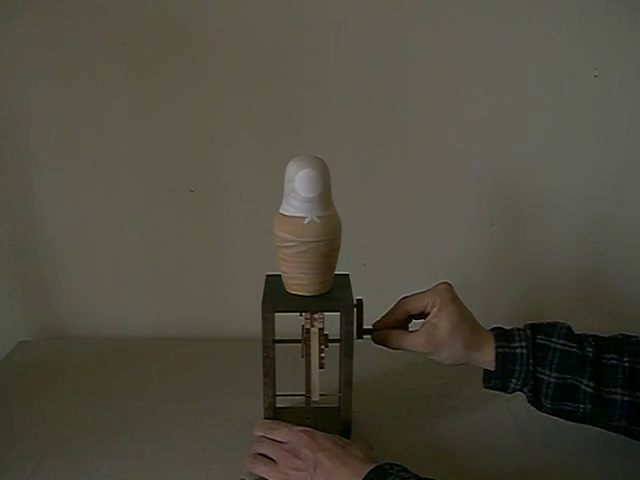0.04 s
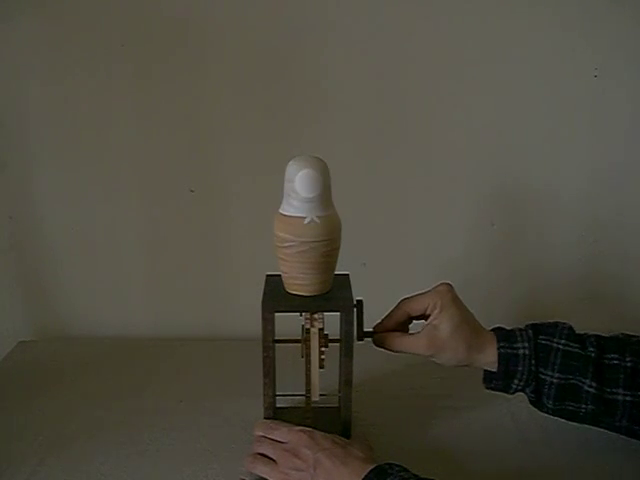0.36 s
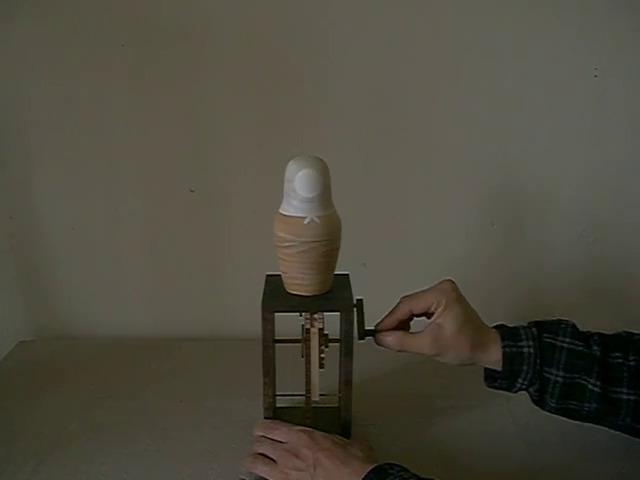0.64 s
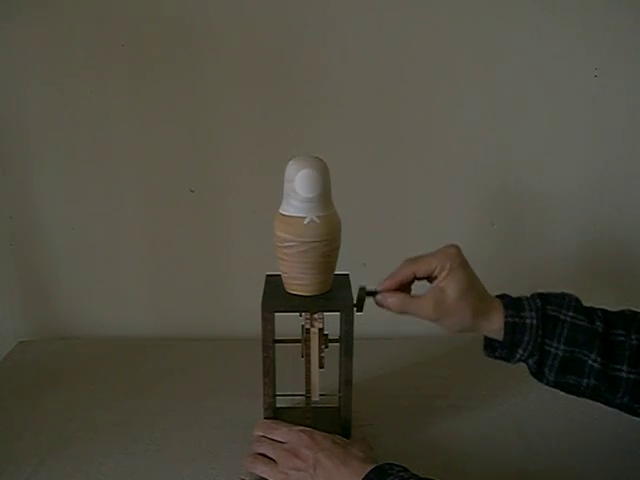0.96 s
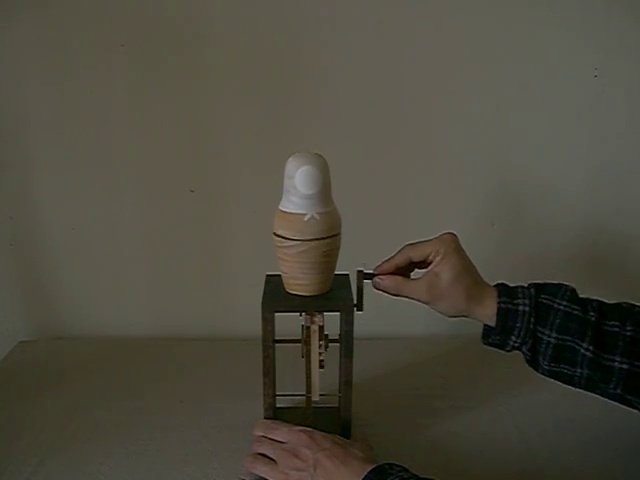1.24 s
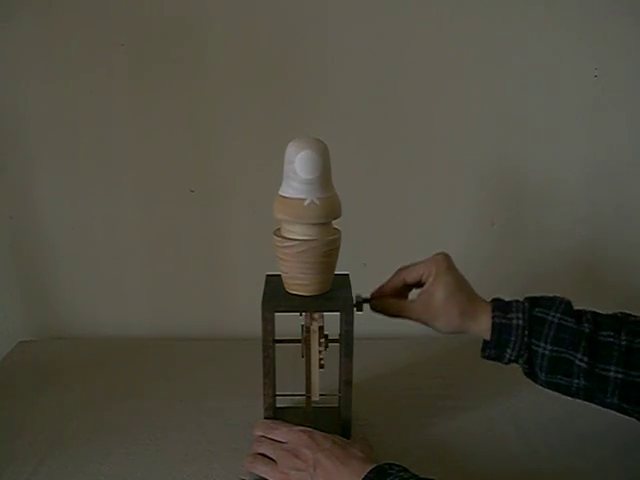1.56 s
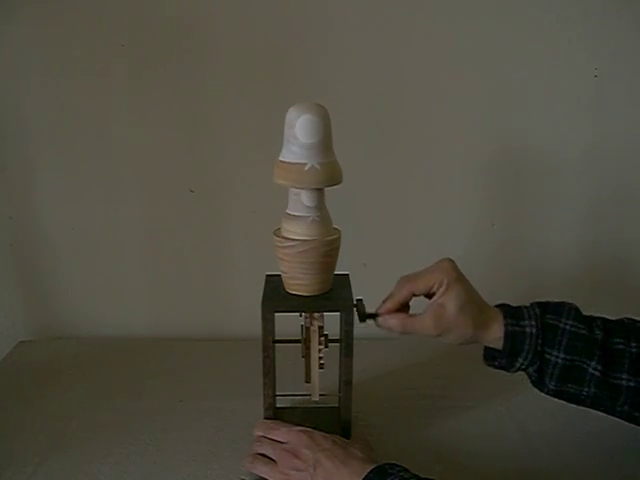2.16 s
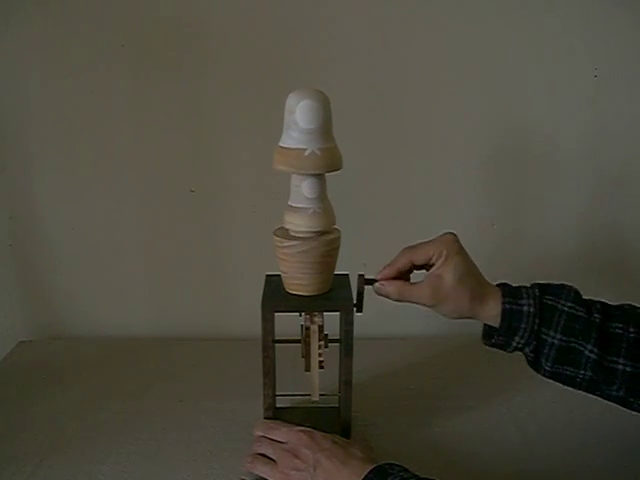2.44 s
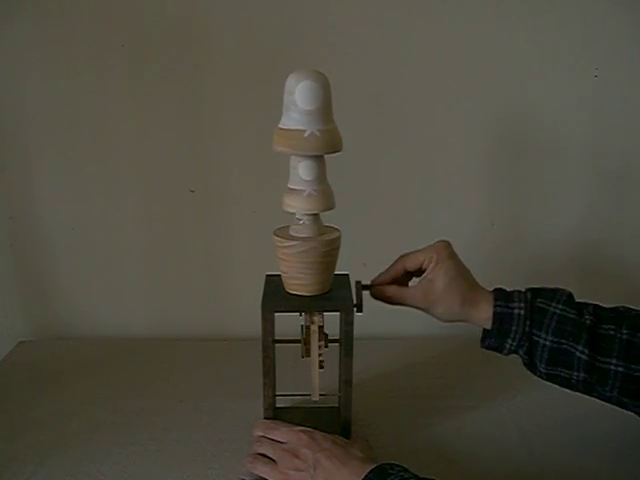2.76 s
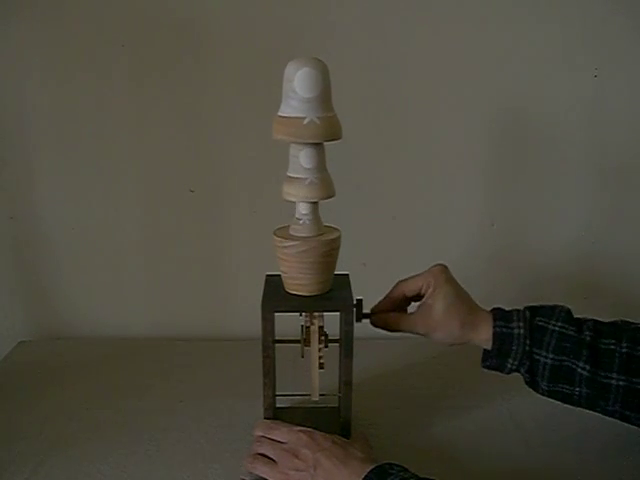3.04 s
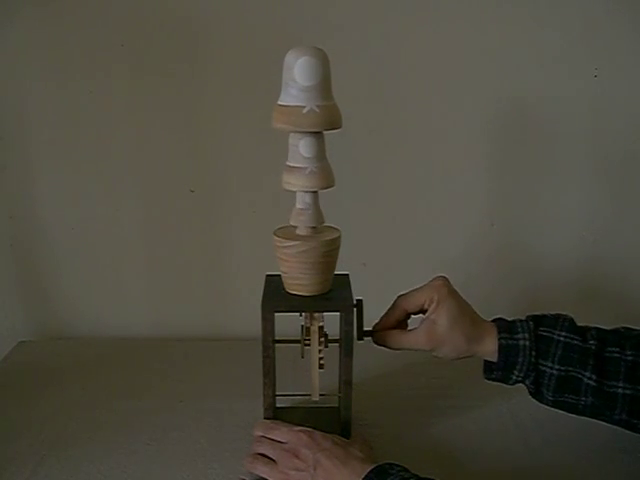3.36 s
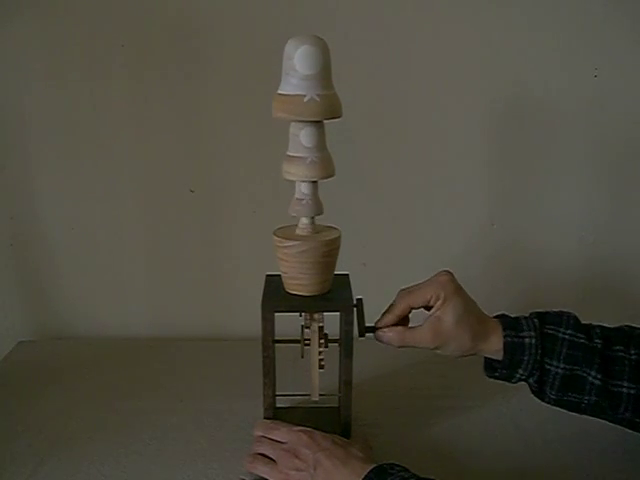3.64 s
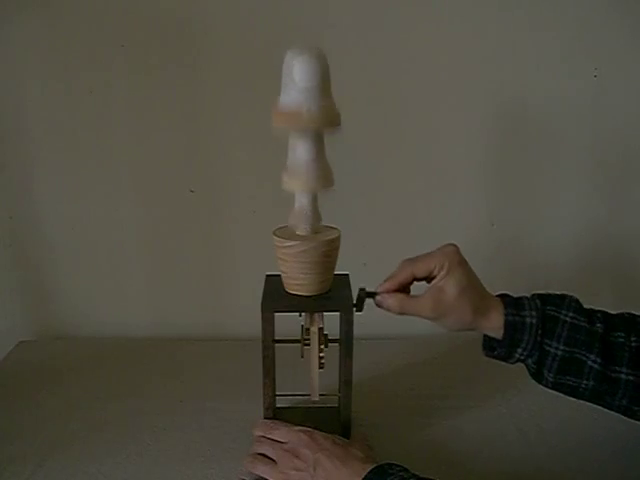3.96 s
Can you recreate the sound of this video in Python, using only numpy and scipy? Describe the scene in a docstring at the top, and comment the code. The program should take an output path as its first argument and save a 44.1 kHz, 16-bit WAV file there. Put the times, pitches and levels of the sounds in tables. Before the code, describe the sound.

A small wooden mechanism is cranked by hand in a quiet, bare room. A clack dies away and another follows a second later. Light, irregular ticks run over a faint axle rumble, with a few tiny squeaks. Then hollow nesting dolls slide down and clack shut in quick succession, leaving a faint hum. A sleeve rustles softly at the end. The microphone adds a steady hiss and a thin whine.

```python
"""A hand cranks a small wooden automaton on a table in a quiet, bare room. A clack dies away at the
start, leaving thin guide rods humming, and another follows a second later. Cams then lift nested hollow
dolls: friction makes the axle rumble, followers tick, and stick-slip motion squeaks. At four seconds the
dolls slide down their rods and clack shut in quick succession, each impact exciting their wall modes.
Last, a sleeve rustles as the hand leaves, over a constant soft hiss and thin electronic whine."""
import sys
import numpy as np
from scipy import signal
from scipy.fft import rfft, irfft, next_fast_len
from scipy.io import wavfile
from scipy.ndimage import uniform_filter1d

SR = 44100
rng = np.random.default_rng(int(sys.argv[2]) if len(sys.argv) > 2 else 0)


def digitize_waveform(pressure):
    """Quantize a signal to 16-bit integers and store it at the path in sys.argv[1].

    Rows of a 2-D input are taken as channels; values are limited to [-1, 1].
    """
    field = np.atleast_2d(pressure).T
    bounded = np.clip(field, -1, 1)
    quanta = np.round(bounded * 32767).astype(np.int16)
    wavfile.write(sys.argv[1], SR, quanta)


N = 282681
LEAD = SR // 4   # samples of run-in before the scene opens
TIME = np.arange(-LEAD, N) / SR
IMPACT_TIME = np.arange(SR // 4) / SR
CRANK_START_S = 1.25

# wall modes of each doll: (ratio to main resonance, relative level [dB], free t60 [s])
OUTER_WALL = [(.115, -5, 0.0838), (.19, -3, 0.03706), (.275, -5, .04), (.45, -3.5, 0.032),
              (.55, -1, 0.0281), (.725, 2, 0.027), (.8, 0.5, 0.012), (.89, -3.5, 0.021), (1.0, 1, .03),
              (1.19, -7, 0.01747)]
MIDDLE_WALL = [(0.705, -2, 0.025), (0.755, 2.5, 0.046), (.82, -1.5, 0.026), (.885, -3, 0.045),
               (0.945, 2, 0.024), (1.0, 3.5, 0.05), (1.04, -3, 0.078), (1.22, -3, 0.035)]
INNER_WALL = [(.69, -8, 0.074), (.75, -6.5, 0.023), (.82, -4, 0.064), (.885, -1, 0.018), (.945, 0.5, 0.06),
              (1.0, 6.5, 0.046), (1.04, 2, 0.052), (1.22, -9, 0.015)]
# rim modes of each doll: (frequency [Hz], relative level [dB], free t60 [s])
OUTER_RIM = [(2335, -2, 0.0884), (2600, -1, .042), (3100, 6, .025), (3284, 5, 0.042),
             (3712.5, -11.5, 0.01284), (4236, -9, 0.011), (4904.5, -9, 0.01812), (5570, -1, 0.02258),
             (6041.4, 4, .014)]
MIDDLE_RIM = [(1852.9, -1, .026), (2343, 0, .022), (2694.3, -2.5, 0.022), (3038, -3, .016),
              (3420, 0.5, .024), (3930.2, -2, .015), (4990, 2, .016), (5584.3, -13, 0.01), (6830, -4, .011)]
INNER_RIM = [(2409.1, -2.5, 0.027), (2600, 1.5, 0.017), (2895, 4.5, .02), (3170, -4, 0.012),
             (3270, 0, .018), (3634, 2.5, .018), (3970, -5, .016), (5020, -9, .01), (5922.7, -28, .011)]
# dolls clacking open or shut: (time [s], strength [dB], main wall resonance [Hz], thud offset [dB],
# wall offset [dB], crack offset [dB], direct-path gain [dB], delay of second contact [s], doll)
CLACKS = [(-.06, -25, 1473, -3, 3, 2.5, 0, 0.004504, "inner"),
          (1.166, -45.5, 1520, -12, -5, 9, -7, .0042, "outer"),
          (1.1734, -30.5, 1511, -5, -4, 1, 0.5, .007, "outer"),
          (4.011, -43, 1520, -2, -9, 9, -0.5, 0.0043, "inner"),
          (4.0189, -33, 1500, -5.5, -7, 2, -2, 0.0094, "middle"),
          (4.066, -28.5, 1576, -2.5, -1.5, 1, 1, 0.006, "middle"),
          (4.128, -20.5, 1468, -7.5, 3.5, 0.5, 2.5, .0031, "middle"),
          (4.196, -19.5, 1470, -4.5, -4, 2.5, 3.5, 0.0046, "inner")]


def clacks():
    """Double impact: two quick wooden contacts a clack. Returns direct sound and the feed to the room."""
    direct, to_room = np.zeros((2, len(TIME)))
    median_db = np.median([row[1] for row in CLACKS])
    dolls = {"outer": (OUTER_WALL, OUTER_RIM), "middle": (MIDDLE_WALL, MIDDLE_RIM),
             "inner": (INNER_WALL, INNER_RIM)}
    for s, db, hz, thud, hollow, crack, direct_db, delay_s, doll in CLACKS:
        wall, rim = dolls[doll]
        first = (s, db + thud, db + hollow + 4, db)   # the first contact drives the wall hardest
        second = (s + delay_s, db + thud - 22.5, db + hollow - 7, db - 10.5)
        for when, thud_db, wall_db, edge_db in (first, second):
            sound = impact(wall_modes(hz, wall), rim, thud_db, wall_db, rim_db=edge_db + 3,
                           crack_db=edge_db + crack + 0.5, crack_t60=0.022, damping_per_s=63,
                           detune=0.014, contact_s=0.00015,
                           treble_db=0.7 * (edge_db - median_db))   # harder contacts are brighter
            add(direct, when, from_db(direct_db) * sound)
            add(to_room, when, sound)
    return direct, to_room


# modes of the frame: (frequency [Hz], relative level [dB], free t60 [s])
FRAME_MODES = [(168.62, -2, 0.073), (217, -8.5, 0.06), (290, 2.5, 0.02), (418, 7, 0.02), (544, 9.5, 0.027),
               (573, 4.5, 0.022), (633, 7, 0.034)]
# spectrum of a contact's crack: (frequency [Hz], relative level [dB])
CRACK_SPECTRUM = [(300, -9), (800, -8.5), (1900, -8), (2900, -1), (4200, -2), (5600, -1), (7200, -2.5),
                  (8800, 0), (10500, -3.5), (12500, -11.5), (17000, -15.5)]


def impact(wall, rim, thud_db, wall_db, rim_db, crack_db, crack_t60, damping_per_s, detune,
           contact_s, treble_db):
    """Impulse response: a contact cracks and excites frame, wall and rim; touching parts add damping."""
    t = IMPACT_TIME
    spectrum = [(hz, db + treble_db * hz / CUTOFF_HZ) for hz, db in CRACK_SPECTRUM]
    sound = from_db(crack_db) * unit_attack(noise(spectrum, len(t)) * decay(t, crack_t60))
    for modes, db in ((FRAME_MODES, thud_db), (wall, wall_db), (rim, rim_db)):
        ringing = ring(modes, t, spread_db=2.5, detune=detune) * np.exp(-damping_per_s * t)
        sound += from_db(db) * unit_attack(ringing)
    return sound * (1 - np.exp(-t / contact_s))   # a glancing contact takes a moment to build


def wall_modes(main_hz, wall=MIDDLE_WALL):
    """Geometric similarity: all modes of a hollow shell scale together with its size."""
    return [(ratio * main_hz, db, t60) for ratio, db, t60 in wall]


def ring(modes, t, spread_db, detune=0.):
    """Modal superposition: damped sines whose level and pitch vary from strike to strike."""
    out = np.zeros(len(t))
    for k, (hz, db, t60) in enumerate(modes):
        strength, pitch = rng.standard_normal(2)
        amplitude = (-1) ** k * from_db(db + spread_db * strength)   # neighbours in opposite phase
        out += amplitude * decay(t, t60) * np.sin(2 * np.pi * hz * (1 + detune * pitch) * t)
    return out


# modes of cams and followers: (frequency [Hz], relative level [dB], free t60 [s])
CAM_MODES = [(2340, -5, .035), (2641.2, -0.5, .02), (2939.8, -2, 0.015), (3384.5, -3, .018),
             (4191.7, -3, .018)]
# knocks of the followers: (time [s], relative click level [dB], relative thud level [dB])
TICKS = [(0.3696, -42.5, -49), (1.545, -40, -46.5), (1.6084, -46.5, -45), (1.704, -37.5, -43.5),
         (1.7445, -39.5, -56.5), (1.7722, -39, -52), (1.9169, -42, -44.5), (2.0183, -41.5, -50),
         (2.147, -39.5, -46), (2.1728, -40.5, -45), (2.1986, -43, -47.5), (2.3278, -42, -45.5),
         (2.3622, -39.5, -46.5), (2.5141, -45, -46), (2.6093, -42.5, -61.5), (2.6771, -42, -49),
         (2.7158, -47.5, -56), (2.7619, -48, -57), (2.8233, -41.5, -42.5), (2.94, -43, -47.5),
         (3.0412, -41, -47), (3.061, -46, -48), (3.266, -46, -42.5), (3.3157, -46, -57),
         (3.564, -42.5, -50), (3.6687, -42.5, -58), (3.681, -45.5, -44.5), (3.7906, -47, -44)]


def ticks():
    """Structure-borne sound: followers strike their cams, and the shock reaches base and dolls."""
    out = np.zeros(len(TIME))
    for s, click_db, thud_db in TICKS:
        wall_hz = 1623 - 130 * max(s - CRANK_START_S, 0)   # the dolls ring lower as they rise apart
        contact_s = 0.0024 * from_db(-33.5 - click_db)   # louder clicks build faster
        knock = impact(wall_modes(wall_hz), CAM_MODES, thud_db - 6.5, wall_db=click_db - 10.5,
                       rim_db=click_db - 7, crack_db=click_db - 12, crack_t60=0.07306,
                       damping_per_s=12, detune=0.042, contact_s=contact_s, treble_db=-4)
        base = unit_attack(ring(BASE_MODES, IMPACT_TIME, spread_db=0.5, detune=0.022))
        add(out, s, knock + from_db(thud_db - 5) * base)
    return out


# upper partials of a squeak: (harmonic number, relative level [dB])
SQUEAK_PARTIALS = [(3, -7.5), (4, -3.5), (5, -8), (6, -0.5), (7, -17.5)]
# cam squeaks: (time [s], length [s], starting pitch [Hz], glide [Hz/s], relative level [dB],
# octave offset [dB], upper partials offset [dB], waver [fraction of pitch])
SQUEAKS = [(1.790, 0.016, 1684, -2000, -43.5, 2, -0.5, 0.021),
           (1.811, 0.018, 1703, -4800, -46.5, 8, 5.5, 0.01497),
           (1.822, 0.033, 1590, 0, -37.5, -6, -11, 0.0141),
           (1.858, 0.044, 1592, 8.5, -65, 23.5, -16, 0.00502),
           (1.895, 0.042, 1566, 0.5, -70.5, 21, -20, 0.005),
           (3.853, 0.029, 1395, 696.5, -50, -18, -35, .03),
           (3.94, 0.052, 1417, 349.5, -47, -23, -30, 0.05053)]


def squeaks():
    """Stick-slip oscillation: a dry cam gives short, wavering harmonic glides, and every slip grates."""
    out, t = np.zeros(len(TIME)), IMPACT_TIME
    for s, length_s, hz, glide, db, octave_db, upper_db, waver_depth in SQUEAKS:
        waver = unit_rms(uniform_filter1d(rng.standard_normal(len(t)), size=50))
        phase = 2 * np.pi * np.cumsum((hz + glide * t) * (1 + waver_depth * waver)) / SR
        upper = sum(from_db(partial_db) * np.sin(k * phase) for k, partial_db in SQUEAK_PARTIALS)
        tone = np.sin(phase) + from_db(octave_db) * np.sin(2 * phase) + from_db(upper_db) * upper
        grit = from_db(-13.5) * np.std(tone) * (1 + np.sin(phase)) * noise(RUB_SPECTRUM, len(t))
        add(out, s, from_db(db - 2.5) * gate(t, length_s, ramp_s=0.0046) * (tone + grit))
    return out


# modes of the base under the bearings: (frequency [Hz], relative level [dB], t60 [s])
BASE_MODES = [(168.5, -4.5, 0.089), (236.61, -8.5, 0.1), (301.3, -3.5, 0.0524), (379, 1, 0.039),
              (476, 1, 0.017), (688, -6, 0.016)]
# the axle's rumble, heard for the first two seconds of cranking: (time [s], relative level [dB])
AXLE_LEVEL = [(1.45, -53), (1.78, -51.5), (2.03, -51), (2.97, -55.5), (3.11, -55.5), (3.61, -51.5),
              (3.95, -44.5)]


def axle():
    """Forced vibration: bearing friction rumbles through the base and rasps faintly in the dolls."""
    t, cranking_s = IMPACT_TIME, TIME - CRANK_START_S
    level = from_db(np.interp(TIME, *np.transpose(AXLE_LEVEL)))
    envelope = level * gate(cranking_s, length_s=2, ramp_s=0.41)
    rumble = friction(ring(BASE_MODES, t, spread_db=0), catches_per_s=65, spread_db=5.5)
    wall = ring(wall_modes(main_hz=1450), t, spread_db=1) * decay(t, 0.044)
    dolls = rasp(rim_db=-15) + from_db(-3.5) * unit_attack(wall)
    scrape = friction(dolls, catches_per_s=510, spread_db=4.5)
    parting = from_db(-cranking_s)   # the dolls rub 1 dB less each second as they part
    return envelope * (from_db(-4.5) * rumble + from_db(-9) * parting * scrape)


def slide(start_s=3.965, rise_s=0.073, top_db=-41.75, swell_db=36.5, low_cut_hz=1500):
    """Sliding friction: the falling dolls scrape louder as they gather speed, and stop as they land."""
    t = TIME - start_s
    speed = np.clip(t / rise_s, 0, 1)
    envelope = from_db(top_db + swell_db * (speed - 1)) * gate(t, length_s=0.167, ramp_s=0.0073)
    scrape = friction(rasp(rim_db=-5.5), catches_per_s=5900, spread_db=7.5)
    return envelope * high_pass(scrape, low_cut_hz, order=3)


# spectrum of wood rubbing on wood: (frequency [Hz], relative level [dB])
RUB_SPECTRUM = [(200, -3), (400, 10), (800, 20.5), (1450, 8.5), (2000, -23.5), (2400, 7.5), (4000, 1),
                (5500, 5.5), (7500, -13), (10500, -16), (17000, -24)]


def rasp(rim_db):
    """Asperity contact: one tiny catch gives a bright scratch and rings the inner doll's rim."""
    t = IMPACT_TIME
    scratch = unit_attack(noise(RUB_SPECTRUM, len(t)) * decay(t, 0.011))
    return scratch + from_db(rim_db) * unit_attack(ring(INNER_RIM, t, spread_db=1))


def friction(response, catches_per_s, spread_db):
    """Shot noise: wood grain catches at random, each catch exciting the same response; unit rms."""
    size = len(TIME)
    catches = (rng.random(size) < catches_per_s / SR) * rng.choice([-1, 1], size)
    strength = from_db(spread_db * np.minimum(rng.exponential(1, size), 3))
    return unit_rms(signal.oaconvolve(catches * strength, response)[:size])


# guide rod modes: (frequency [Hz], level at first clack [dB], level at last clack [dB], t60 [s])
ROD_MODES = [(130, -54, -57, 4.3), (134.4, -49, -49.5, 4.5), (1103.5, -56, -49.5, 2.97),
             (2380, -42, -66, 0.9)]


def rods():
    """Free vibration: the lightly damped rods hum on after the first clack and the last."""
    out, t = np.zeros(len(TIME)), np.arange(2 * SR) / SR
    for hz, first_db, last_db, t60 in ROD_MODES:
        hum = decay(t, t60) * np.sin(2 * np.pi * hz * t)
        add(out, CLACKS[0][0], from_db(first_db) * hum)
        add(out, CLACKS[-1][0], from_db(last_db) * hum)
    return out


# the sleeve drawing back: (time [s], level [dB])
SLEEVE_LEVEL = [(5.0, -71.5), (5.55, -62.5), (5.72, -53.5), (5.9, -55.5), (6.1, -52.5), (6.45, -52.5)]
# spectrum of rustling cloth: (frequency [Hz], relative level [dB])
SLEEVE_SPECTRUM = [(50, -14), (130, 4.5), (260, -2.5), (750, -2), (1500, -10), (3000, -11.5), (7000, -15.5),
                   (16000, -19)]


def sleeve():
    """Friction noise: cloth gives a broadband rustle that swells as the hand leaves."""
    times, db = np.transpose(SLEEVE_LEVEL)
    envelope = from_db(np.interp(TIME, times, db)) * (TIME > times[0])
    return envelope * noise(SLEEVE_SPECTRUM, len(TIME))


# reverberation time of the room: (frequency [Hz], t60 [s])
ROOM_T60 = [(120, 1), (300, 0.19), (600, 0.6), (1300, 0.55), (2100, 0.42335), (3200, 0.62), (5500, 0.4),
            (8000, 0.37), (12000, 0.37), (16000, 0.2)]
# strength of the reverberation: (frequency [Hz], gain [dB])
ROOM_GAIN = [(120, -4.5), (165, 7), (280, 0.5), (600, -2), (830, 1), (1100, 3), (1500, -3.5), (2050, -2.5),
             (3100, -4.5), (6000, -5), (10000, -8), (16000, -14)]


def room(x, build_s=0.008):
    """Reverberation: diffuse reflections build up quickly, then each band decays at its own rate."""
    t, hz = np.arange(SR) / SR, np.fft.rfftfreq(SR, 1 / SR)
    white, tail = rfft(rng.standard_normal(SR)), 0
    edges = np.geomspace(40, SR / 2, 19)
    for low, high in zip(edges, edges[1:]):
        centre = np.sqrt(low * high)
        envelope = decay(t, at_hz(ROOM_T60, centre)) * (1 - np.exp(-(t / build_s) ** 2))
        band = irfft(white * (hz >= low) * (hz < high), SR) * envelope
        unit_gain_band = unit_rms(band) * np.sqrt(2 * (high - low)) / SR
        tail = tail + from_db(at_hz(ROOM_GAIN, centre)) * unit_gain_band
    return signal.oaconvolve(x, tail)[:len(x)]


# spectrum of the hiss: (frequency [Hz], relative level [dB])
HISS_SPECTRUM = [(25, -5.5), (65, -2.5), (90, -6.5), (130, 2.5), (170, -1.5), (380, -0.5), (520, -5),
                 (750, -8), (1100, -9.5), (2000, -15), (3500, -17), (8000, -22), (14000, -19.5),
                 (17000, -17.5)]
# tones of the whine: (frequency [Hz], rms level [dB])
WHINE_TONES = [(4700, -79), (15734, -65)]


def electronics():
    """Self-noise: the circuits add a steady hiss and a thin whine."""
    hiss = from_db(-52) * noise(HISS_SPECTRUM, N)
    t = TIME[LEAD:]
    whine = sum(from_db(db) * np.sqrt(2) * np.sin(2 * np.pi * hz * t) for hz, db in WHINE_TONES)
    return hiss + whine


def from_db(db):
    """Decibels to amplitude ratio."""
    return 10 ** (np.asarray(db) / 20)


def unit_rms(x):
    """Normalisation to unit rms."""
    return x / np.sqrt(np.mean(x ** 2) + 1e-20)


def unit_attack(x):
    """Normalisation to unit rms over the first 20 ms."""
    return x / np.sqrt(np.mean(x[:SR // 50] ** 2) + 1e-20)


def at_hz(points, hz):
    """Interpolation on a log-frequency axis."""
    frequencies, values = np.transpose(points)
    return np.interp(np.log(np.maximum(hz, 1)), np.log(frequencies), values)


def noise(spectrum, size):
    """Spectral shaping of white noise; unit rms."""
    padded = next_fast_len(size)
    gain = from_db(at_hz(spectrum, np.fft.rfftfreq(padded, 1 / SR)))
    return unit_rms(irfft(rfft(rng.standard_normal(padded)) * gain, padded)[:size])


def high_pass(x, hz, order):
    """Maximally flat high-pass filtering."""
    return signal.sosfilt(signal.butter(order, hz, "high", fs=SR, output="sos"), x)


def decay(t, t60):
    """Exponential decay, by 60 dB in t60 seconds."""
    return np.exp(-np.log(1000) * t / t60)


def gate(t, length_s, ramp_s):
    """Trapezoidal envelope: rise, hold and fall."""
    return np.clip(np.minimum(t, length_s - t) / ramp_s, 0, 1)


def add(out, s, sound):
    """Superposition of a sound starting at s seconds."""
    start = LEAD + round(s * SR)
    out[start:start + len(sound)] += sound[:len(out) - start]


def scene():
    """Direct and reverberant fields of the automaton sum with the rods and the sleeve."""
    works = ticks() + slide() + axle() + squeaks()
    automaton = works + np.array(clacks())
    direct, to_room = high_pass(automaton, hz=133, order=4)   # small parts radiate little bass
    return (direct + sleeve() + room(to_room) + rods())[None, LEAD:]


# notches of the microphone housing: (frequency [Hz], width [Hz], gain [dB])
HOUSING_NOTCHES = [(4702.4, 280, -17), (7830, 280, -6), (9200, 1600, -17.5)]
CUTOFF_HZ = 17100


def record(dry):
    """Transduction: the housing cuts notches, self-noise enters, peaks saturate and the top is cut."""
    x = dry
    for hz, width_hz, db in HOUSING_NOTCHES:
        band = signal.lfilter(*signal.iirpeak(hz, hz / width_hz, fs=SR), x)
        x = x + (from_db(db) - 1) * band
    x = x + electronics()
    x = 1.2 * np.tanh(x / 1.2)
    return signal.sosfilt(signal.ellip(10, .2, 70, CUTOFF_HZ, fs=SR, output="sos"), x)


dry = scene()
out = record(dry)
digitize_waveform(out)
```